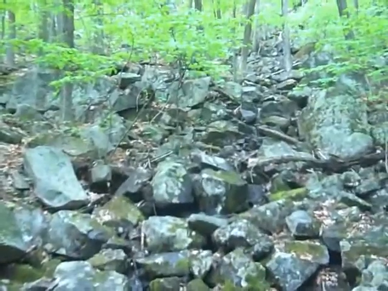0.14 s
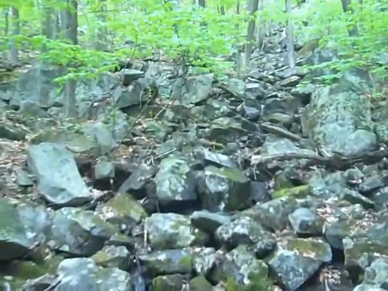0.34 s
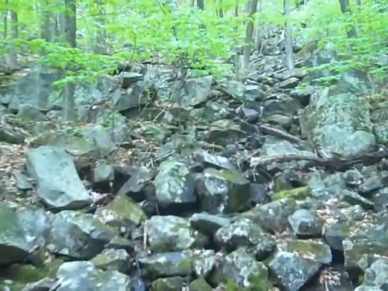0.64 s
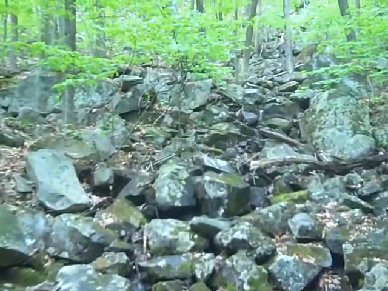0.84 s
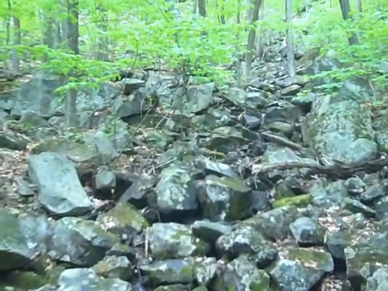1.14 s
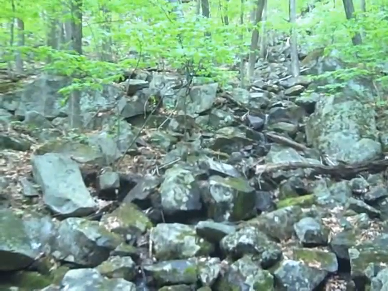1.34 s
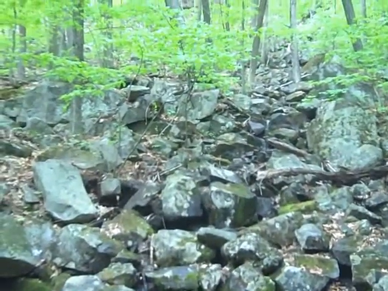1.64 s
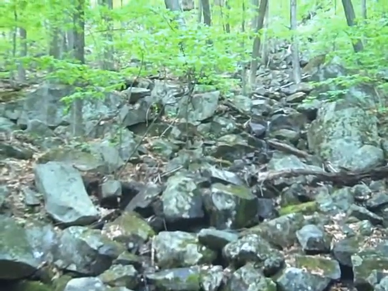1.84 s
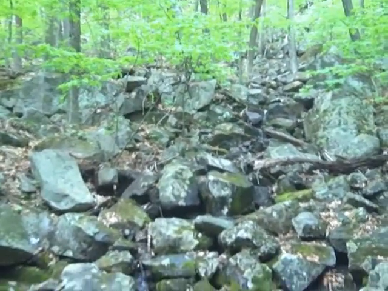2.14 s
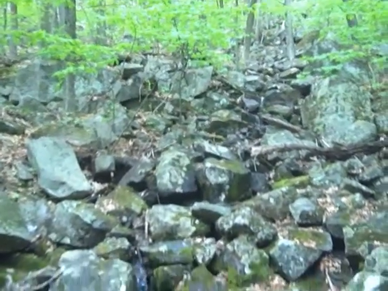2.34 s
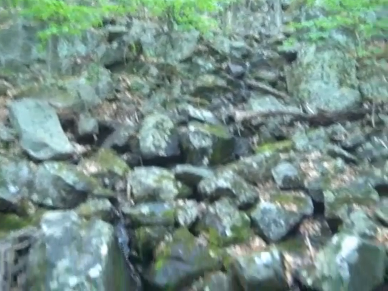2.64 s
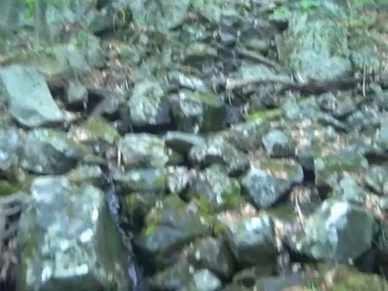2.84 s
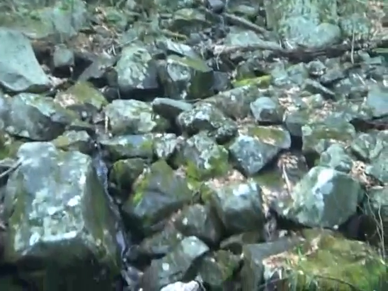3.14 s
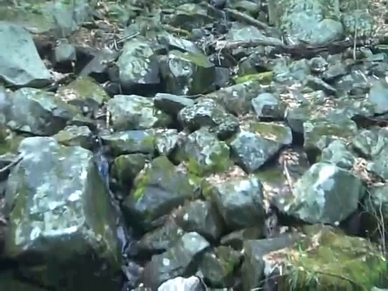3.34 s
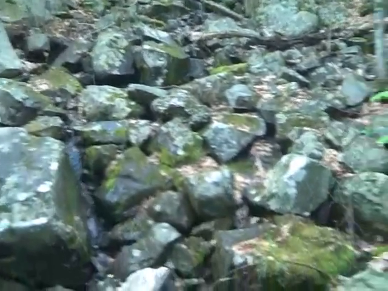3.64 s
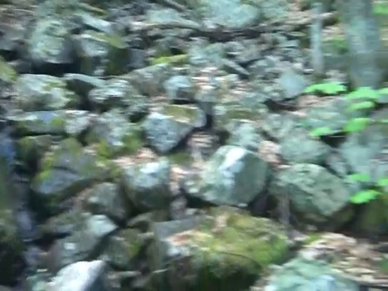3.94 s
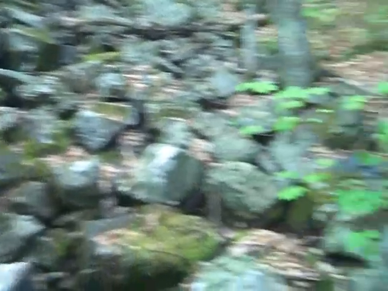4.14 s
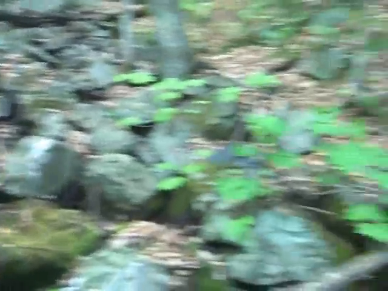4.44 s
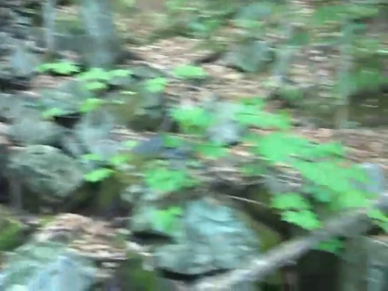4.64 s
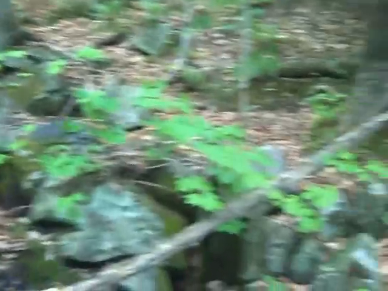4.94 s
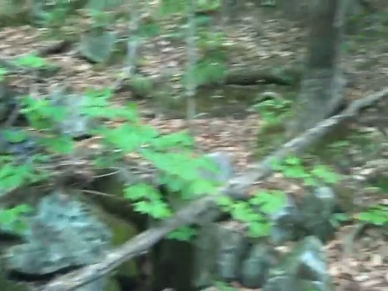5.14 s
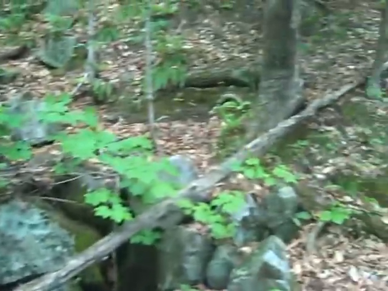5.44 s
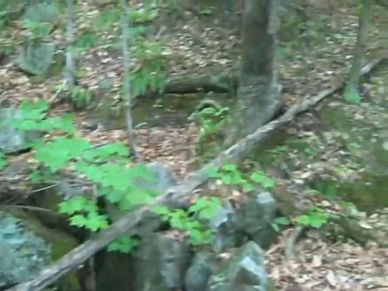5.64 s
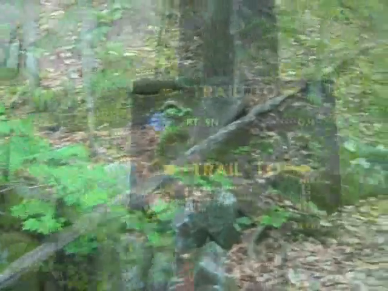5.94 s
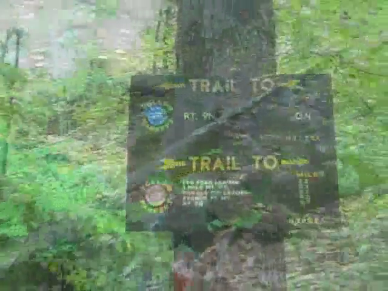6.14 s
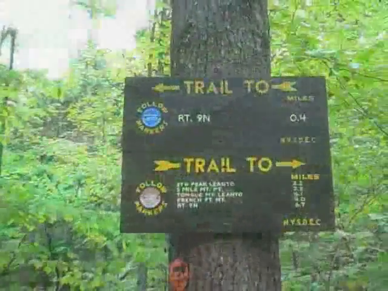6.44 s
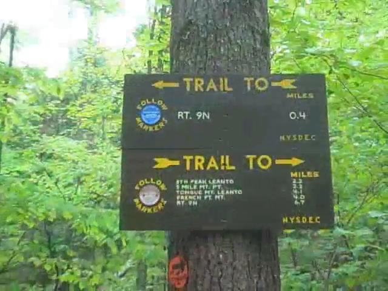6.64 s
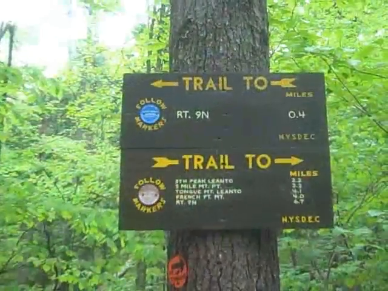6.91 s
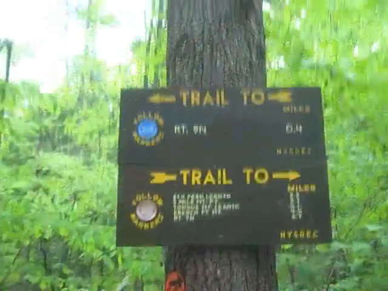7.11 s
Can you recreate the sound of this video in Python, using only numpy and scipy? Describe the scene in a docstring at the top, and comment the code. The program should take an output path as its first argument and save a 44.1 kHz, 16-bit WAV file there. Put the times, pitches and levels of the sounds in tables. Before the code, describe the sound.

Close, mono handheld pickup of shallow water rushing among boulders: fluttering spray, sharp high plips, small sloshes and low gurgles. Soft hand thuds come mostly as the microphone moves. The rush warbles briefly midway and again as it fades out from about five and a half seconds, leaving faint forest hiss with a barely audible low hum.

```python
"""A small brook runs over mossy rocks, heard by one small hand-held microphone, the same in both ears.
Coloured noise makes the rush of spray; decaying sines make tiny bubbles, near plips, glugs and low blips.
The microphone tilts slightly to the stones from 2.1 s, then turns away from 3.14 s.
Separately, narrow random gaps make the rush hollow and warbly around 2.5 s, and again from about 5.5 s.
From 5.6 s the brook fades; from 6.1 s quiet forest air rises, a coloured hiss with a faint sine hum."""
import sys
import numpy as np
from scipy import signal
from scipy.fft import rfft, irfft, next_fast_len
from scipy.io import wavfile
from scipy.ndimage import uniform_filter1d, map_coordinates

SR = 44100
rng = np.random.default_rng(int(sys.argv[2]) if len(sys.argv) > 2 else 0)


def put_to_file(sound):
    """Save the sound as 16-bit audio at rate SR, in the file named by the first command-line argument."""
    columns = np.atleast_2d(sound).T  # one column per channel
    safe = np.clip(columns, -1, 1)
    whole_steps = np.round(safe * 32767)
    wavfile.write(sys.argv[1], SR, whole_steps.astype(np.int16))


N = 320607

# Spectrum of the water: (frequency [Hz], relative density [dB])
WATER_SPECTRUM = [(120, -33), (250, -25), (365, -22), (408, -9), (468, -2), (530, -3), (690, -0.9),
                  (860, -3), (2100, -0.5), (3800, -1.5), (4250, -7.5), (5500, -10.5), (6100, -11.5),
                  (7200, -13.5)]
# Spectrum of quiet forest air: (frequency [Hz], relative density [dB])
AIR_SPECTRUM = [(25, 12), (70, -7.5), (140, 4), (190, -2.5), (450, -3.5), (700, 0), (1500, 1.5),
                (3600, -4.5), (4300, -14.5), (5500, -17.5), (6100, -16), (7200, -15)]
# Loudest near bubbles: (time [s], relative peak level [dB], pitch during the ring [Hz])
LOUD_PLIPS = [(0.072, -31, 4220), (0.4908, -26.5, 2130), (0.5142, -25, 3050), (0.5443, -30, 3300),
              (0.6397, -33, 1620), (0.7234, -28, 2600), (0.8237, -28.5, 2510), (0.8766, -36, 1530),
              (0.99, -29.5, 3160), (1.0372, -33, 2290), (1.055, -28.5, 2680), (1.156, -33, 2480),
              (1.199, -30, 2690), (1.206, -32, 1900), (1.238, -39, 1820), (1.4596, -27, 2350),
              (1.6393, -29, 2380), (1.7514, -27.5, 1850), (1.7865, -29, 3300), (1.9247, -31.5, 2180),
              (3.0252, -28.5, 2620), (3.06, -31, 2930), (3.189, -28, 2980), (3.201, -29, 3200),
              (3.581, -32, 3880), (3.7658, -26, 3200), (4.134, -32, 4150), (4.151, -35, 4480),
              (4.2961, -30, 2260), (4.502, -30.5, 3700), (4.6679, -36, 2180), (4.9353, -34.5, 1770),
              (4.9533, -31, 3100), (5.095, -35, 2410), (5.537, -28, 3450)]
# Hollow glugs, and faint low blips below about 350 Hz:
# (time [s], relative peak level [dB], pitch during the ring [Hz])
GLUGS_AND_BLIPS = [(0.152, -52, 947), (0.196, -50, 1240), (0.25, -62, 372), (0.309, -57, 431),
                   (0.756, -45.5, 610), (0.88, -70.5, 182), (0.992, -47, 1110), (1.175, -44, 1270),
                   (1.25, -53, 473), (1.37, -64.5, 313), (1.59, -48, 687), (1.679, -46, 1055),
                   (1.69, -64, 327), (1.807, -70, 194), (1.822, -44.5, 1190), (2.012, -49, 440),
                   (2.062, -48, 990), (2.11, -64, 322), (2.176, -46.5, 1125), (2.405, -45, 1050),
                   (2.545, -44, 1470), (2.562, -52, 603), (2.623, -59, 603), (2.715, -54, 473),
                   (2.729, -49, 910), (2.884, -51, 581), (3.013, -43, 1420), (3.024, -47, 680),
                   (3.126, -46, 1314), (3.136, -57.5, 390), (3.141, -51, 463), (3.19, -65.5, 243),
                   (3.422, -45, 755), (3.51, -70, 203), (3.548, -52, 875), (3.699, -50.5, 482),
                   (3.76, -52, 464), (3.764, -43, 1410), (3.957, -64, 286), (4.003, -51, 991),
                   (4.025, -52.5, 435), (4.122, -43, 707), (4.212, -49, 920), (4.216, -44, 695),
                   (4.228, -52, 423), (4.272, -46, 1443), (4.345, -64.5, 300), (4.359, -49, 694),
                   (4.533, -52, 460), (4.63, -44, 750), (4.70, -66, 256), (4.80, -70.5, 294),
                   (4.833, -47, 502), (4.847, -48, 730), (4.90, -55.5, 398), (4.939, -47, 1150),
                   (5.009, -51, 534), (5.015, -68, 278), (5.059, -48, 697), (5.075, -68.5, 160),
                   (5.15, -49, 797), (5.18, -67, 309), (5.182, -49, 790), (5.26, -64, 323),
                   (5.368, -46, 960), (5.40, -62.5, 342), (5.546, -48, 720), (5.752, -46.5, 980)]
# Sloshes against the rocks: (crest time [s], relative level [dB], Gaussian width [s], centre [Hz])
ROCK_SLOSHES = [(0.523, -50, 0.018, 2720), (0.644, -44, 0.0065, 1900), (1.745, -46, 0.0055, 1900),
                (3.038, -46.5, 0.0064, 2240), (4.236, -43.5, 0.011, 2920), (4.454, -45, 0.0055, 1990),
                (5.066, -44, 0.0044, 1470), (5.543, -53, 0.023, 1780)]
# Spurts of fine spray, all in one band: (crest time [s], relative level [dB])
SPRAY_SPURTS = [(0.8, -55.5), (0.9, -56), (1.098, -55), (1.41, -53), (2.215, -54.5), (2.6, -57.5),
                (3.17, -53.5), (3.72, -53.5), (4.237, -57), (4.96, -56.5)]
# Hollow, warbly colouring: (time [s], depth scale of the gaps [dB])
WARBLE_DEPTH = [(1.1, 0), (1.22, 10), (1.55, 8), (1.7, 0), (2.26, 0), (2.31, 32), (2.95, 26), (3.03, 0),
                (3.8, 0), (3.9, 12), (4.05, 0), (5.5, 0), (5.56, 28), (6.3, 24), (6.9, 15), (7.2, 1)]
# Pace of the water over the stones: (time [s], level [dB])
FLOW_LEVEL = [(0.02, -1.1), (0.2, 1), (0.42, -0.4), (0.55, -0.2), (0.9, -0.6), (1.2, 0), (1.35, 0),
              (1.7, -0.5), (2.1, -0.5), (2.36, -1), (2.55, 0.75), (3.05, 0), (3.3, -0.3), (3.75, 0),
              (4.0, 0.4), (4.5, -0.2), (4.85, -0.2), (5.55, -0.16), (5.83, -0.4), (5.9, 1), (6.08, -0.2)]
# Thuds of the hand on the microphone: (time [s], relative peak level [dB], pitch [Hz])
HAND_BUMPS = [(0.3, -77, 44.7), (1.399, -67, 86), (2.19, -65, 45), (2.98, -64, 61.7), (3.46, -72, 40),
              (3.79, -68, 55), (4.08, -66, 47.7), (4.12, -67.5, 129), (4.39, -64, 65), (4.65, -68, 58.6),
              (4.75, -64, 60), (5.165, -69, 108), (5.27, -68, 55), (5.34, -68, 45)]

# Microphone band: edge of the full band, and the frequency above which nothing remains
TOP_HZ, END_HZ = 7280, 9100
# Brook: base level, then a straight fade of gain to a faint remainder
BROOK_DB, FADE_START_S, FADE_END_S, REMAINDER_DB = -46.5, 5.61, 6.62, -25.5
# Forest air: level once it has fully risen
AIR_DB, AIR_START_S, AIR_FULL_S = -62.5, 6.1, 6.41
# Tilt towards the stones: gurgle lift before it, and the small further lift it brings
TILT_START_S, TILT_END_S = 2.1, 2.7
LEVEL_GURGLE_DB, TILT_GURGLE_CHANGE_DB = 0.1, 0.2
# Turn away: changes of rush level and treble, and the treble lift before it
TURN_START_S, TURN_END_S = 3.14, 7.7
TURN_CHANGE_DB, FACING_TREBLE_DB, TURN_TREBLE_CHANGE_DB = -1, 0.45, -2.5
# Near bubbles: periods to the peak, fractional pitch climb, scattered level, trim of the loudest ones
PLIP_CYCLES, PLIP_RISE, PLIP_WET_DB, PLIP_DB = 2.5, 0.091, -9, -7.5
# Random fainter bubbles: middle of the peak levels, half-width of their range, pitch range
STRAY_DB, STRAY_SCATTER_DB, STRAY_LOW_HZ, STRAY_HIGH_HZ = -46, 3.5, 1900, 3620
# Splash bands: Gaussian widths in octaves, and the common width and centre of the spurts
SLOSH_OCTAVES = 0.82
SPURT_S, SPURT_HZ, SPURT_OCTAVES = 0.022, 4650, 0.11
# Warble: range, weight of the broad gaps, flat top between gaps, lift [dB per dB of depth]
WARBLE_LOW_HZ, WARBLE_HIGH_HZ, WARBLE_BROAD, WARBLE_FLAT_TOP, WARBLE_LIFT = 750, 4000, .25, -.25, .012
# Drops striking wet stone: level against the rush
TICK_DB = -14.5


def amp(db):
    """Logarithmic level: decibels become an amplitude gain."""
    return 10 ** (np.asarray(db) / 20)


def unit(x):
    """Power normalisation: the signal is scaled to rms 1."""
    return x / np.sqrt(np.mean(x ** 2) + 1e-20)


def ramp(start_s, end_s):
    """Linear interpolation: a straight rise from 0 to 1 between two times."""
    return np.clip((np.arange(N) / SR - start_s) / (end_s - start_s), 0, 1)


def wobble(rate):
    """Slow random modulation: a smooth curve through random knots, rate of them a second."""
    knots = rng.standard_normal(int(N * rate / SR) + 4)
    return map_coordinates(knots, [np.arange(N) * rate / SR])


def filtered(x, response):
    """Linear filtering: the spectrum is multiplied by a response of frequency."""
    m = next_fast_len(N + 8192)
    return irfft(rfft(x, m) * response(np.fft.rfftfreq(m, 1 / SR)), m)[:N]


def bass(x):
    """Low-pass filtering: the part below about 1 kHz, where the water gurgles."""
    return filtered(x, lambda hz: 1 / (1 + (hz / 1000) ** 4))


def upper(x):
    """High-pass filtering: the part above about 2 kHz, which dulls when the microphone faces away."""
    return filtered(x, lambda hz: 1 / (1 + (2200 / (hz + 1)) ** 4))


def treble(x):
    """High-pass filtering: the part above about 4 kHz."""
    return filtered(x, lambda hz: 1 / (1 + (4000 / (hz + 1)) ** 8))


def coloured(x, points):
    """Spectral shaping: (frequency [Hz], level [dB]) points on a log axis, then rms 1."""
    point_hz, db = np.transpose(points)

    def response(hz):
        level = np.interp(np.log(hz + 1), np.log(point_hz), db)
        return amp(level) * (hz < END_HZ)
    return unit(filtered(x, response))


def smooth_field(shape, bins, frames):
    """Local averaging: a random field smoothed over frequency bins and time frames, at rms 1."""
    field = uniform_filter1d(rng.standard_normal(shape), size=bins, axis=0)
    return unit(uniform_filter1d(field, size=frames, axis=1))


def patchy_noise(patchy_db):
    """Random modulation: white noise in patches of uneven gain, some 600 Hz by 50 ms."""
    z = signal.stft(rng.standard_normal(N), nperseg=512)[2]
    patches = amp(patchy_db * smooth_field(z.shape, bins=7, frames=9))
    return unit(signal.istft(z * patches, nperseg=512)[1][:N])


def bubbles(s, gain, hz, cycles, rise, size):
    """Damped resonance: each sine swells softly, then decays as its pitch climbs by the fraction rise."""
    age = np.arange(size) / SR * (hz / cycles)[:, None]  # in decay times
    phase = 2 * np.pi * cycles[:, None] * (age + rise * (age - 1 + np.exp(-age)))
    envelope = age * np.exp(1 - age)  # peaks at 1 after one decay time
    ring = gain[:, None] * envelope * np.sin(phase)
    at = (s * SR).astype(int)[:, None] + np.arange(size)
    return np.bincount(at.ravel(), ring.ravel(), N)[:N]


def bubble_cloud(low_hz, high_hz, cycles, spread_db, rise, count, size):
    """Random superposition: bubbles at random times and pitches, many faint and a few strong."""
    when, pitch, strength, life = rng.random((count, 4)).T
    hz = low_hz + (high_hz - low_hz) * pitch
    lives = cycles * 2 ** (life - .5) * np.sqrt(hz / low_hz)  # periods per decay time
    level = spread_db * np.minimum(-np.log(1 - strength), 4)
    gain = amp(level) * np.sqrt(hz / lives)
    return unit(bubbles(when * N / SR, gain, hz, lives, rise, size))


def among_rocks(x, wet_db, t60):
    """Diffuse scattering: boulders add a short tail, one of six in turn every 1/8 s."""
    t = np.arange(SR // 6) / SR
    envelope = amp(-60 * t / t60) * (1 - np.exp(-t / 0.0018))
    tails = rng.standard_normal((6, len(t))) * envelope
    place = np.arange(N) // (SR // 8) % len(tails)
    echo = np.zeros(N)
    for k, tail in enumerate(tails):
        echo += signal.fftconvolve(x * (place == k), tail / np.linalg.norm(tail))[:N]
    return x + amp(wet_db) * echo


def rumble():
    """Low-frequency turbulence: faint air movement on the microphone, swelling gently."""
    spectrum = [(12, 2.5), (25, 4), (45, -2.5), (80, -10.0), (160, -11.5), (300, -14), (500, -38.5)]
    low = coloured(rng.standard_normal(N), spectrum)
    swell = amp(1.5 * wobble(7))
    return amp(-80.0) * unit(low * swell)


def forest_air():
    """Broadband noise plus a tone: a soft hiss with a faint low hum of wandering phase."""
    hum = np.sin(2 * np.pi * 229 * np.arange(N) / SR + 0.22 * wobble(4.4))
    return coloured(patchy_noise(patchy_db=1.2), AIR_SPECTRUM) + amp(-15.0) * hum


def bumps():
    """Heavily damped resonance: soft low thuds of the hand, most of them while the microphone turns."""
    s, db, hz = np.transpose(HAND_BUMPS)
    return bubbles(s, amp(db), hz, np.full(len(s), .9), rise=0, size=8000)


def spray(s, length, centre_hz, octaves):
    """Band-limited noise burst: a Gaussian band under a Gaussian swell, near rms 1 at its crest."""
    def response(hz):
        offset = np.log2((hz + 1) / centre_hz) / octaves
        return np.exp(-.5 * offset ** 2) * (hz < END_HZ)
    band = filtered(rng.standard_normal(N), response)
    return unit(band) * np.exp(-.5 * ((np.arange(N) / SR - s) / length) ** 2)


def splashes():
    """Bandwidth contrast: sloshes are mostly brief and broad, spurts are high and narrow."""
    sloshes = sum(amp(db) * spray(s, length, hz, SLOSH_OCTAVES) for s, db, length, hz in ROCK_SLOSHES)
    spurts = sum(amp(db) * spray(s, SPURT_S, SPURT_HZ, SPURT_OCTAVES) for s, db in SPRAY_SPURTS)
    return sloshes + spurts


def ringing(rows, cycles, rise, wet_db):
    """Isolated resonances: damped sines ring out singly over the rush, scattered by the rocks."""
    s, db, hz = np.transpose(rows)
    start_hz = hz / (1 + rise / 2)  # the climb passes through the listed pitch
    rings = bubbles(s, amp(db), start_hz, np.full(len(s), cycles), rise, size=4000)
    return among_rocks(rings, wet_db, t60=0.19)


def glugs_and_blips():
    """Damped resonance: hollow glugs ring out, with faint low blips below about 350 Hz."""
    return ringing(GLUGS_AND_BLIPS, cycles=2.94, rise=0.017, wet_db=-11.0)


def stray_plips(count):
    """Random arrivals: rows of (time [s], level [dB], pitch [Hz]) for fainter near bubbles."""
    when, strength, pitch = rng.random((count, 3)).T
    db = STRAY_DB + STRAY_SCATTER_DB * (2 * strength - 1)
    hz = STRAY_LOW_HZ * (STRAY_HIGH_HZ / STRAY_LOW_HZ) ** pitch
    return np.transpose([when * N / SR, db, hz])


def plips():
    """Bubble resonance: loud near bubbles stand out, and fainter ones burst at random times."""
    loud = ringing(LOUD_PLIPS, PLIP_CYCLES, PLIP_RISE, PLIP_WET_DB)
    stray = ringing(stray_plips(count=22), PLIP_CYCLES, PLIP_RISE, PLIP_WET_DB)
    return amp(PLIP_DB) * loud + stray


def flow():
    """Amplitude modulation: gain of the rush as the water swells and slackens."""
    return amp(np.interp(np.arange(N) / SR, *np.transpose(FLOW_LEVEL)))


def brook():
    """Superposed noise and resonances: fluttering spray, small bubbles, ticking drops and gurgles."""
    trickle = bubble_cloud(low_hz=593, high_hz=7270, cycles=0.77, spread_db=3.0, rise=0.17, count=9000, size=500)
    trickle = among_rocks(trickle, wet_db=-3, t60=0.08)
    water = unit(trickle) + amp(6.5) * patchy_noise(patchy_db=1.2)
    # the range below the treble flutters quickly; the fine hiss above it stays smooth
    surge = amp(.2 * wobble(22) + 0.39 * wobble(70))
    hiss = treble(water)
    water = coloured(surge * (water - hiss) + hiss, WATER_SPECTRUM)
    ticks = bubble_cloud(low_hz=1200, high_hz=5200, cycles=.35, spread_db=2, rise=0, count=520, size=200)
    tinkle = bubble_cloud(low_hz=1105, high_hz=3710, cycles=4, spread_db=5.5, rise=0.03, count=900, size=2400)
    hollow = bubble_cloud(low_hz=445.5, high_hz=490, cycles=3.7, spread_db=1, rise=0.024, count=120, size=4000)
    gurgle = bubble_cloud(low_hz=546, high_hz=811, cycles=2.6, spread_db=2.5, rise=0.13, count=150, size=2400)
    water = water + amp(TICK_DB) * coloured(ticks, WATER_SPECTRUM)
    return unit(water + amp(-18.5) * tinkle + amp(-20.5) * hollow + amp(-23) * gurgle)


def warbled(x):
    """Time-varying filtering: narrow random gaps come and go, so the rush sounds hollow and warbly."""
    hz, t, z = signal.stft(x, SR, nperseg=4096, noverlap=3072)
    fine = smooth_field(z.shape, bins=5, frames=4)
    broad = smooth_field(z.shape, bins=18, frames=3)
    in_range = (hz > WARBLE_LOW_HZ) & (hz < WARBLE_HIGH_HZ)
    depth_db = np.interp(t, *np.transpose(WARBLE_DEPTH)) * in_range[:, None]
    gaps = np.minimum(fine + WARBLE_BROAD * broad, WARBLE_FLAT_TOP)
    gain = amp(depth_db * gaps)
    # normalise the gain to rms 1 over neighbouring frequencies
    gain = gain / np.sqrt(uniform_filter1d(gain ** 2, size=50, axis=0))
    lift = amp(WARBLE_LIFT * depth_db)
    return signal.istft(z * gain * lift, SR, nperseg=4096, noverlap=3072)[1][:N]


def scene():
    """Changing balance: the microphone tilts slightly and turns away; the brook yields to forest air."""
    down, away = ramp(TILT_START_S, TILT_END_S), ramp(TURN_START_S, TURN_END_S)
    rush = amp(BROOK_DB + TURN_CHANGE_DB * away) * flow() * brook()
    gurgle_gain = amp(LEVEL_GURGLE_DB + TILT_GURGLE_CHANGE_DB * down)
    treble_gain = amp(FACING_TREBLE_DB + TURN_TREBLE_CHANGE_DB * away)
    rush = rush + bass(rush) * (gurgle_gain - 1) + upper(rush) * (treble_gain - 1)
    near = plips() + glugs_and_blips() + splashes()
    fade = np.maximum(1 - ramp(FADE_START_S, FADE_END_S), amp(REMAINDER_DB))
    air = amp(AIR_DB) * ramp(AIR_START_S, AIR_FULL_S) * forest_air()
    mono = warbled(fade * rush + air) + fade * near + rumble() + bumps()
    return np.array([mono, mono])


def record(dry):
    """Transducer response: a narrow treble resonance, a shallow dip, and a steep drop above the band."""
    def response(hz):
        resonance = 1 + amp(4.0) / (1 + ((hz - 5375) / 95) ** 2)
        dip = 1 - amp(-8.0) / (1 + ((hz - 6200) / 190) ** 2)
        band = 1 / np.sqrt(1 + (hz / TOP_HZ) ** 600)
        # a weak remainder above the band, which ends at END_HZ
        skirt = amp(-15 - 10 * np.log2(1 + (hz / 8000) ** 8)) * (hz > TOP_HZ) * (hz < END_HZ)
        return resonance * dip * (band + skirt)
    return np.array([filtered(x, response) for x in dry])


dry = scene()
out = record(dry)
put_to_file(out)
```